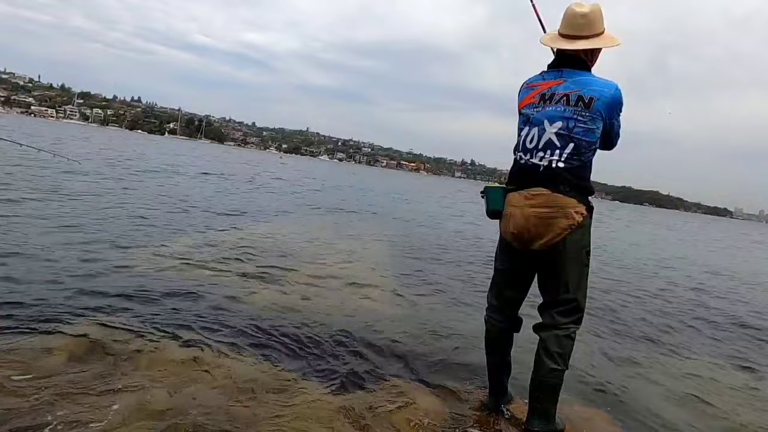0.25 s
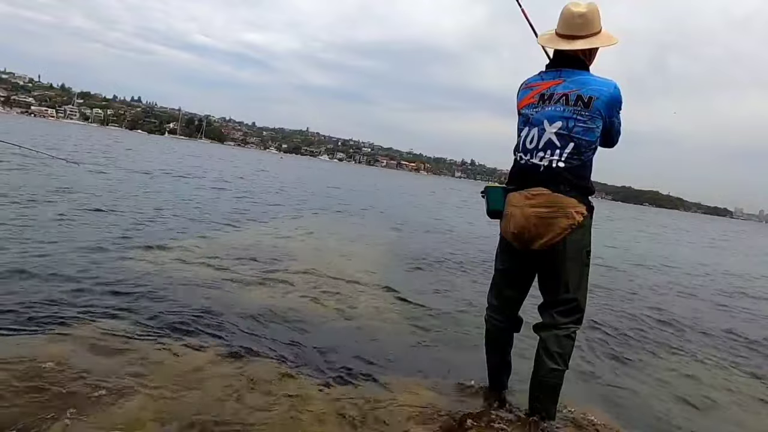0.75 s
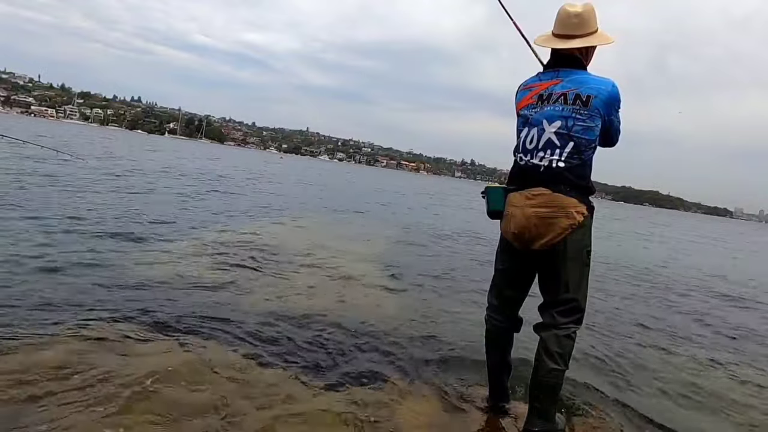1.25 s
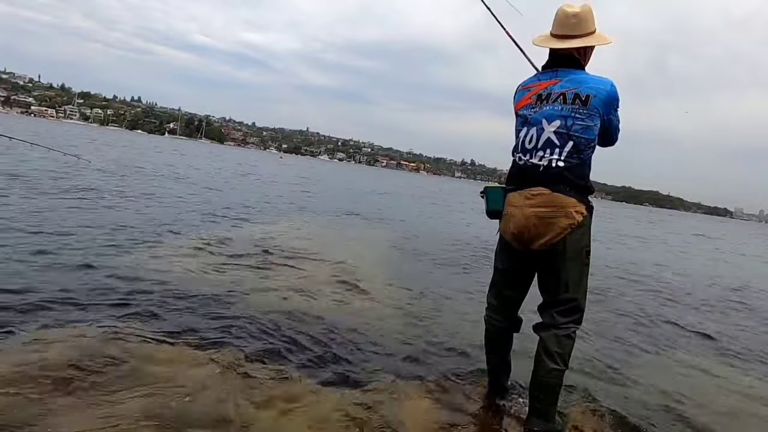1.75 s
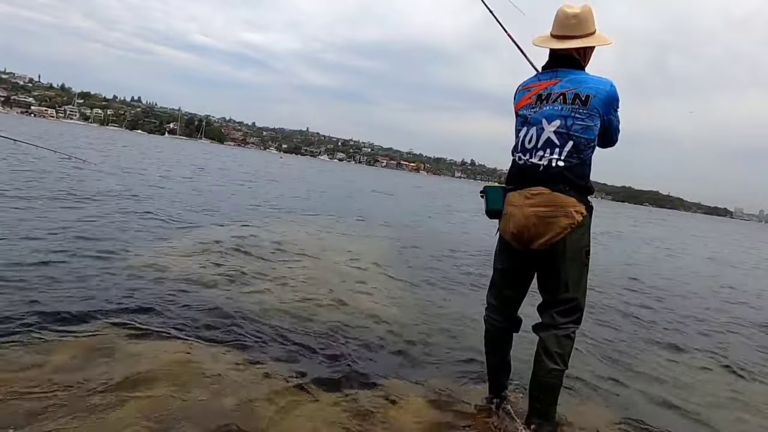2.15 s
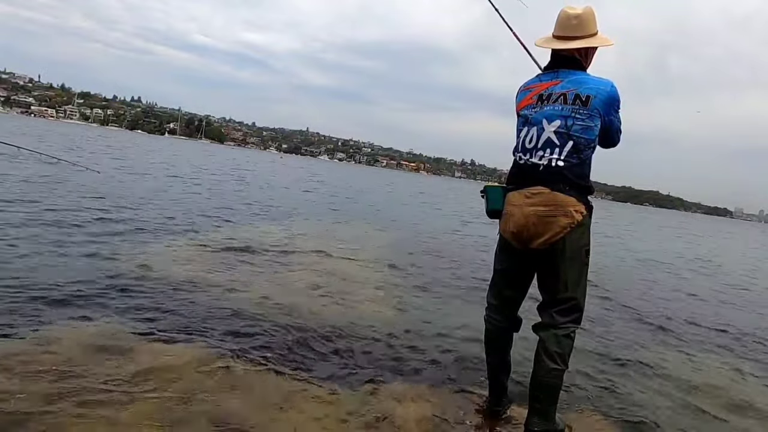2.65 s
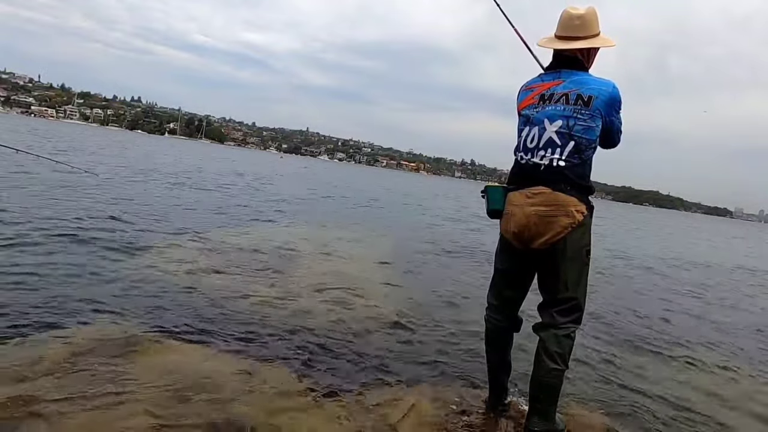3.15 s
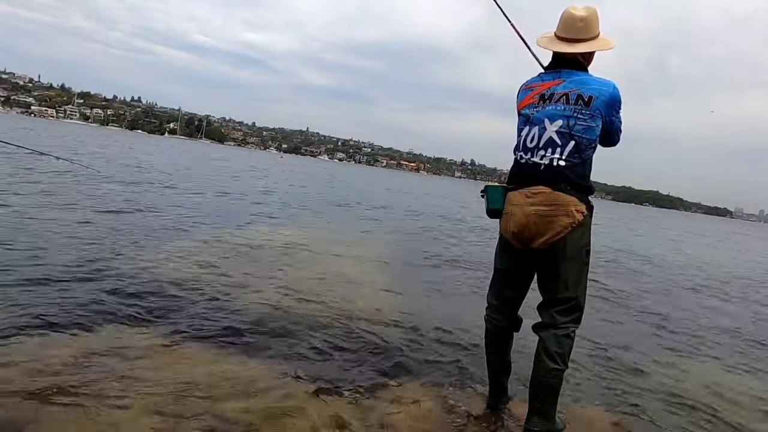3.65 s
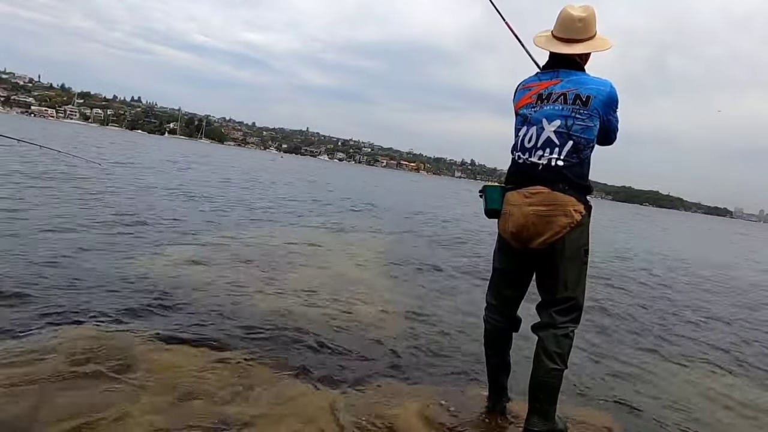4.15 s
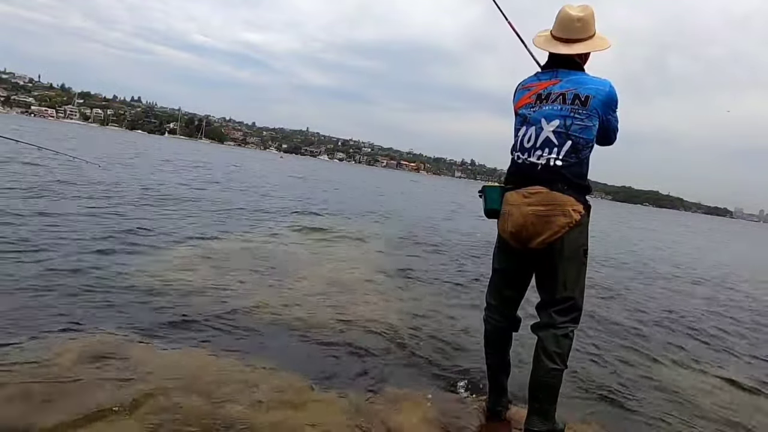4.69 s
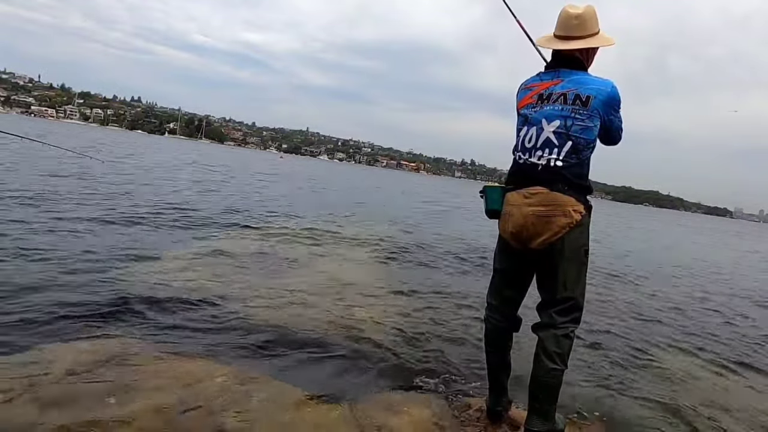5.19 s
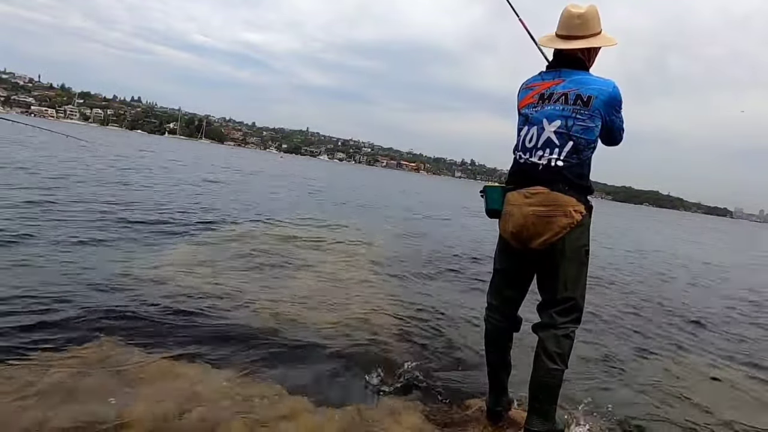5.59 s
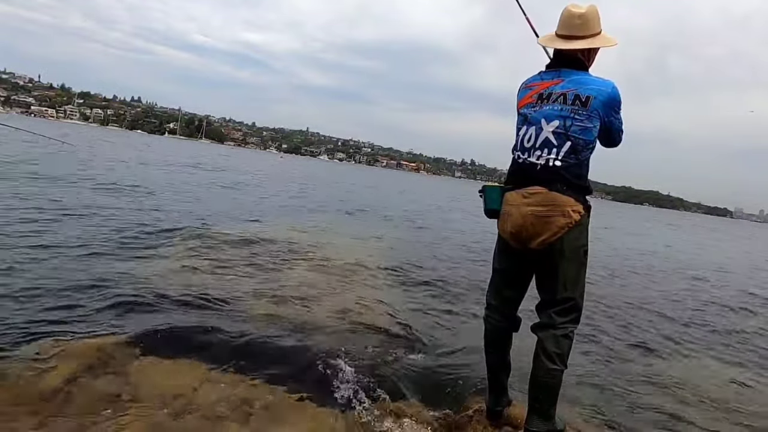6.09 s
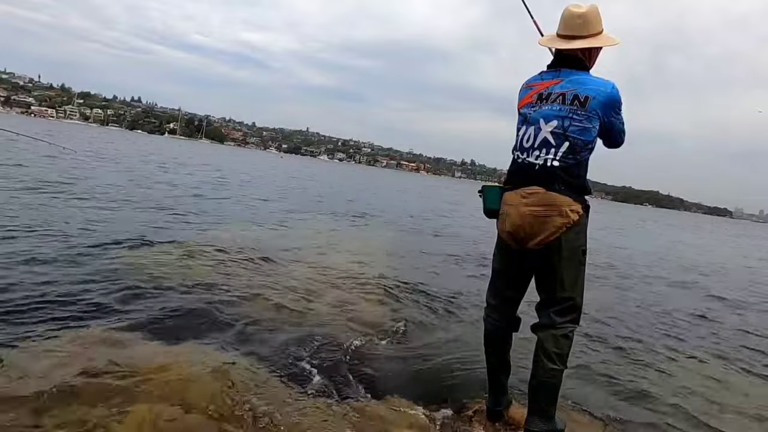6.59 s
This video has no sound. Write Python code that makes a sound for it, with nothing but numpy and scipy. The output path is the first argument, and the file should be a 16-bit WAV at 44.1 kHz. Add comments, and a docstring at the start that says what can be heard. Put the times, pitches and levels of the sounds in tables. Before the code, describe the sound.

Small waves lap and gurgle against a rock ledge, with glugs, plops and droplets close by, under low rumbling wind and a faint drone.

```python
"""Waves lap a rock ledge for under 7 s: bubble swarms wash over wind rumble and a faint low drone throughout.
First a lone glug (a pitch-rising sine), then laps, slaps (short dull noise), plops and a glug cluster near 1.4 s.
A thin hiss swells near 2.2 s; calmer water follows, with close droplets (noise tick plus ringing sine) to 3.9 s.
From 4.1 s stronger laps, spatters (clustered ticks) and dense plops; foam and hiss rise to the end,
while the wind gusts hard near 6.3 s and then drops."""
import sys
import numpy as np
from scipy import signal
from scipy.fft import rfft, irfft, next_fast_len
from scipy.io import wavfile
from scipy.ndimage import map_coordinates

SR = 44100
rng = np.random.default_rng(int(sys.argv[2]) if len(sys.argv) > 2 else 0)


def pcm_store(signal):
    """Save signal as 16-bit PCM."""
    levels = np.round(np.clip(np.atleast_2d(signal), -1, 1) * 32767)
    wavfile.write(sys.argv[1], SR, levels.astype(np.int16).T)


N = 301203

# water running over the ledge, base level: time_s, level_db
FLOW = [(0.0, -43.5), (0.3, -44.5), (1.25, -38), (1.86, -40), (2.28, -38), (2.57, -43.5), (3.04, -46),
        (3.52, -40.5), (4.17, -44), (4.53, -39), (5.48, -38.5), (6.05, -37.5), (6.58, -35.5), (6.83, -35)]
# waves lapping the rock, slosh at crest: crest_s, level_db, drain_s (of power)
LAPS = [(0.768, -32.5, 0.04), (1.08, -30.5, 0.053), (1.29, -35.5, 0.055), (1.52, -33.5, 0.016),
        (1.7, -34, 0.062), (2.02, -33, 0.095), (2.3, -37.5, 0.8), (3.12, -36, 0.11), (3.49, -35.5, 0.49),
        (4.17, -33, 0.084), (4.45, -27.5, 0.045), (4.61, -29.5, 0.05), (5.35, -33, 0.046),
        (5.81, -32, 0.04), (6.22, -35.5, 0.078), (6.42, -34, 0.06)]
# base level of the finest bubbles: time_s, level_db
FOAMING = [(0, -56), (.5, -54.5), (1.1, -51), (1.65, -51.5), (2.45, -52), (2.6, -55.5), (2.9, -57.5),
           (3.95, -55), (4.7, -48), (5.5, -50), (6.5, -44), (6.83, -45)]
# spectra of big, middling and tiny bubbles and of fine spray: freq_hz, relative_db
SLOSH_SPECTRUM = [(90, 4), (160, 4.5), (220, 1.5), (330, -0.5), (500, -2), (700, -6), (950, -8.5),
                  (1600, -17), (3000, -62)]
WASH_SPECTRUM = [(300, -18), (550, 2), (800, -4), (1100, -5), (1600, -9), (2200, -20), (3000, -28),
                 (5000, -43), (9000, -96)]
FOAM_SPECTRUM = [(1200, 0.5), (2000, 3.5), (2700, 0), (4000, -4.5), (5000, -8.5), (6500, -16),
                 (7800, -21.5), (8600, -18), (10000, -24.5), (11500, -32.5), (13000, -48), (15500, -65)]
SPRAY_SPECTRUM = [(4000, -34), (7500, -7), (9000, 0), (10300, 2), (11500, -5), (12400, -7), (15600, -25)]
# wavelets slapping the stone: peak_s, rms_at_peak_db, centre_hz, rise_s
SLAPS = [(0.621, -30.5, 800, 0.0014), (0.744, -29, 700, 0.0012), (0.774, -30.5, 930, 0.0024),
         (0.792, -37, 1000, 0.0029), (0.997, -34, 800, 0.0031), (1.085, -30, 600, 0.0029),
         (1.302, -36, 905, 0.004), (1.369, -31, 580, 0.0032), (1.467, -37, 1010, 0.0038),
         (1.652, -33, 640, 0.002), (2.354, -29, 633, 0.0019), (2.467, -27.5, 745, 0.00253),
         (2.565, -30, 450, 0.0025), (4.124, -32.5, 1250, 0.003), (4.395, -33, 696, 0.004),
         (4.43, -31.5, 830, 0.0093), (4.465, -32, 647, 0.0078), (4.533, -39, 750, 0.0029),
         (4.582, -29, 590, 0.0039), (4.635, -32, 680, .008), (4.939, -34, 1420, 0.0024),
         (5.21, -32, 550, 0.002), (5.454, -34, 606, 0.0019), (5.491, -35.5, 1400, .004),
         (5.643, -31, 650, 0.0016), (5.78, -30.5, 1380, .003), (5.839, -33, 500, 0.006),
         (6.217, -31, 750, 0.0048), (6.413, -31.5, 890, .005)]
# trapped air pockets: peak_s, peak_db, pitch_at_peak_hz, swell_s
GLUGS = [(0.459, -26, 313, 0.0033), (1.09, -20, 344, 0.0043), (1.311, -15, 168, 0.01),
         (1.347, -16, 206, 0.011), (1.372, -20, 150, .003), (1.425, -11.5, 182, 0.024),
         (1.461, -20.5, 275, .007), (1.481, -13.5, 400, 0.006), (1.937, -14.5, 285, 0.0015),
         (1.953, -18, 245, 0.0016), (2.28, -23.5, 387, 0.0016), (4.195, -20.5, 337, 0.0045),
         (4.215, -24, 169, 0.011), (6.599, -23.5, 191.3, 0.012)]
# single bubbles pinching off: start_s, level_db, start_pitch_hz
PLOPS = [(.739, -17, 547), (.7565, -15, 406), (0.771, -21, 900), (.996, -25, 830), (1.156, -21, 705),
         (1.235, -20, 820), (1.284, -20, 524), (1.298, -16, 486), (1.369, -26, 980), (1.647, -22, 596),
         (1.827, -26, 950), (2.013, -20, 980), (2.051, -27, 370), (2.351, -19, 502), (3.488, -22, 880),
         (3.573, -26, 666), (4.122, -19, 510), (4.445, -18.5, 304), (4.457, -22, 950), (4.476, -19, 660),
         (4.529, -22, 500), (4.607, -22, 380), (4.648, -19, 500), (4.937, -24, 1440), (5.209, -21, 600),
         (5.278, -20, 450), (5.317, -24, 1320), (5.452, -17, 565), (5.57, -27, 1000), (5.641, -22, 680),
         (5.69, -21, 590), (5.836, -22, 830), (5.945, -22, 920), (6.024, -21, 970), (6.21, -18.5, 476),
         (6.247, -21, 440), (6.289, -19, 390), (6.368, -23, 606), (6.414, -21, 600), (6.472, -20, 570),
         (6.525, -20, 1050), (6.698, -19, 1010), (6.796, -18, 334), (6.798, -18, 980)]
# droplets landing close by: start_s, level_db (before DROP_TRIM_DB), start_pitch_hz, decay_s
DROPS = [(.158, -34, 8100, 0.00048), (.6, -28, 4160, 0.0018), (1.043, -32, 8960, .0005),
         (1.1, -31, 3400, .002), (2.42, -25.5, 3200, 0.0013), (2.423, -37, 12000, .001),
         (2.465, -32, 9700, 0.0003), (2.475, -26, 3080, 0.00076), (3.059, -31.5, 5130, 0.00047),
         (3.088, -34, 6200, .0004), (3.137, -36, 11500, .0002), (3.163, -31, 4300, .0005),
         (3.217, -21, 5500, 0.000088), (3.356, -31, 1850, 0.0028), (3.64, -42, 11500, .0002),
         (3.896, -23.5, 1810, 0.0022), (4.151, -30, 3180, 0.0024), (4.196, -29, 6650, 0.00037),
         (4.538, -25.5, 2030, 0.0035), (4.704, -22.5, 2190, 0.0018), (5.987, -30, 9500, 0.00036),
         (6.015, -23, 3060, 0.0019), (6.024, -17, 4260, 0.00036)]
# handfuls of spray falling back: peak_s, rms_at_peak_db, rise_s
SPATTERS = [(0.785, -54, .008), (1, -47, 0.006), (1.3, -47, 0.0094), (2.097, -47, .003),
            (2.476, -48, 0.0059), (2.67, -54, .012), (3.358, -52, 0.0033), (3.896, -53, .005),
            (4.119, -42.5, 0.0044), (4.16, -54, 0.0096), (4.194, -48, .002), (4.463, -46, 0.0072),
            (4.732, -48, .008), (5.138, -45.5, 0.0021), (5.808, -48, .004), (6.232, -46, .002),
            (6.41, -48, 0.0067)]
# spectrum of a spatter: freq_hz, relative_db
SPATTER_SPECTRUM = [(1000, -14), (2000, 7), (4000, 2.5), (6500, -6), (9000, -15.5), (15000, -33)]
# filter for bubbles bursting on the stone: freq_hz, gain_db (relative)
CRACKLE_SPECTRUM = [(2500, -10), (4500, 0), (9000, -4), (11500, -12), (15000, -22)]
# breeze rumble before eddies: time_s, level_db
WIND = [(0, -33), (1.3, -30), (1.9, -29.5), (2.3, -33), (2.8, -30.5), (3.2, -30.5), (3.9, -30.5),
        (4.6, -28.5), (5.1, -29), (5.6, -30.5), (6.0, -29), (6.4, -34), (6.83, -39)]
# gusts on the microphone before colouring noise: crest_s, level_db
GUSTS = [(.47, -31), (.65, -27), (1.75, -28), (2.68, -30.5), (3.03, -27), (3.46, -25.5), (3.63, -24),
         (4.33, -25.5), (4.85, -27), (5.42, -27), (6.27, -22.5), (6.45, -26.5)]
# spectrum of the wind rumble: freq_hz, relative_db
RUMBLE_SPECTRUM = [(8, -19), (22, -2.5), (40, -0.5), (70, 0), (100, -2), (130, -8.5), (190, -12),
                   (300, -18), (700, -29), (2000, -100)]
# thin high hiss: time_s, level_db
HISS = [(0, -77.5), (2.2, -68.5), (2.7, -75.5), (3.54, -74), (3.65, -95), (4.4, -86), (4.6, -99),
        (5.7, -94), (6.6, -71)]
# spectrum of the hiss: freq_hz, relative_db
HISS_SPECTRUM = [(9000, -28), (11300, -7), (12000, 4), (13000, 2), (14000, -3), (15600, -9)]
# drone tones: pitch_hz, level_db, wander_hz
DRONE = [(90.94, -39, 2.94), (211, -46.5, 1.656)]

# big and middling bubbles relative to FLOW; tiny ones relative to FOAMING
SLOSH_DB, WASH_DB, FOAM_DB = 3, -1.5, 2.5
# smaller bubbles stirred up by a lap, relative to its slosh
LAP_RISE_S, LAP_WASH_DB, LAP_FOAM_DB = 0.036, -36, -19.5
# unsteadiness: ripple for all bubbles, gurgle for big ones, chatter for middling ones
RIPPLE_SLOW_DB, RIPPLE_FAST_DB, GURGLE_DB, CHATTER_DB = .5, 0.75, 1.96, .5
# power share of near, separately heard bubbles
NEAR_SHARE, NEAR_BIG_SHARE = .17, .04
SLAP_CUT_RATIO = 2.05  # extra treble cut, in multiples of centre_hz
GLUG_FADE_S, GLUG_RISE_OCT_PER_S = .006, 22
PLOP_DECAY_CYCLES, PLOP_PHASE_RISE_PER_S = 2, 5.1
DROP_TRIM_DB, TICK_DB, TICK_DECAY_S = -4.5, -3.0, 0.0015
CRACKLE_DB = -23  # relative to FOAMING
GUST_RISE_S, GUST_FALL_S, EDDY_DB, EDDIES_PER_S = 0.036, 0.033, 1.5, 14
TOP_HZ = 15700


def amp(db):
    """Decibels to gain."""
    return 10 ** (np.asarray(db) / 20)


def unit(x):
    """Scale to rms 1."""
    return x / np.sqrt(np.mean(x ** 2) + 1e-20)


def curve(rows):
    """(time_s, value) rows to one value per sample."""
    time_s, value = np.transpose(rows)
    return np.interp(np.arange(N) / SR, time_s, value)


def wobble(knots_per_s):
    """Smooth random curve through normal knots."""
    knots = rng.standard_normal(int(N * knots_per_s / SR) + 4)
    return map_coordinates(knots, [np.arange(N) * knots_per_s / SR])


def filtered(x, response):
    """Apply a gain that is a function of frequency."""
    size = next_fast_len(N + 8192)
    gain = response(np.fft.rfftfreq(size, 1 / SR))
    return irfft(rfft(x, size) * gain, size)[:N]


def coloured(x, spectrum):
    """Filter by (freq_hz, db) points, log-interpolated; rms 1."""
    freq_hz, db = np.transpose(spectrum)
    return unit(filtered(x, lambda hz: amp(np.interp(np.log(hz + 1), np.log(freq_hz), db))))


def noise():
    """White noise."""
    return rng.standard_normal(N)


def swell(crest_s, db, rise_s, fall_s):
    """Power of a surge: Gaussian rise, exponential fall."""
    t = np.arange(N) / SR - crest_s
    exponent = np.where(t < 0, (t / rise_s) ** 2, np.abs(t / fall_s))
    return amp(db) ** 2 * np.exp(-exponent)


def bubbles(count, low_hz, high_hz, cycles, spread_db, rise, size):
    """Swarm of damped bubble tones rising in pitch, at random times; rms 1."""
    when, pitch, life, strength, turn = rng.random((count, 5)).T[:, :, None]
    hz = low_hz * (high_hz / low_hz) ** pitch
    decay_s = cycles * 2 ** (2 * life - 1) / hz
    t = np.arange(size) / SR
    age = t / decay_s
    gain = amp(-spread_db * np.log(1 - .98 * strength)) * hz  # a few stand far out
    tone = np.sin(2 * np.pi * hz * t * (1 + rise * age / (2 + age)))
    envelope = np.exp(-age) * (1 - np.exp(-2 * t * hz))
    grains = gain * np.sign(turn - .5) * tone * envelope
    index = (when * N).astype(int) + np.arange(size)
    return unit(np.bincount(index.ravel(), grains.ravel(), N)[:N])


def froth(swarm, share, spectrum):
    """Single bubbles standing out of a noise blur of farther ones; rms 1."""
    share = np.clip(share, 0, 1)
    return coloured(np.sqrt(share) * swarm + np.sqrt(1 - share) * noise(), spectrum)


def water():
    """Flow and laps stir bubbles: big ones slosh, middling ones chatter, tiny ones fizz; ripples shake all."""
    flow_db = curve(FLOW)
    lap_power = sum(swell(s, db, LAP_RISE_S, drain_s) for s, db, drain_s in LAPS)

    def stirred(steady_db, lap_db):
        """Add steady and lap power; return gain."""
        return np.sqrt(amp(steady_db) ** 2 + amp(lap_db) ** 2 * lap_power)

    slosh_gain = stirred(flow_db + SLOSH_DB + GURGLE_DB * wobble(12), 0)
    wash_gain = stirred(flow_db + WASH_DB + CHATTER_DB * wobble(25), LAP_WASH_DB)
    foam_gain = stirred(curve(FOAMING) + FOAM_DB, LAP_FOAM_DB)
    big = bubbles(count=700, low_hz=250, high_hz=1100, cycles=3, spread_db=1, rise=0.22, size=2000)
    middling = bubbles(count=3000, low_hz=600, high_hz=3600, cycles=3.4, spread_db=2, rise=.1, size=900)
    small = bubbles(count=5000, low_hz=1800, high_hz=13000, cycles=4, spread_db=3.3, rise=.06, size=500)
    slosh = slosh_gain * froth(big, NEAR_BIG_SHARE, SLOSH_SPECTRUM)
    wash = wash_gain * froth(middling, NEAR_SHARE, WASH_SPECTRUM)
    foam = foam_gain * froth(small, NEAR_SHARE, FOAM_SPECTRUM)
    # fine spray grows faster than the foam
    spray = amp(45.5) * foam_gain ** 2.72 * coloured(noise(), SPRAY_SPECTRUM)
    ripple = amp(RIPPLE_SLOW_DB * wobble(20) + RIPPLE_FAST_DB * wobble(90))
    return ripple * (slosh + wash + foam + spray)


def slaps():
    """A wavelet meets stone: band-shaped noise that starts fast and dies more slowly."""
    out, t = np.zeros(N + SR), np.arange(SR // 5) / SR
    hz = np.fft.rfftfreq(len(t), 1 / SR)
    for peak_s, db, centre_hz, rise_s in SLAPS:
        band = (hz / centre_hz) ** 2 / (1 + (hz / centre_hz) ** 4)
        dulling = 1 / (1 + (hz / (SLAP_CUT_RATIO * centre_hz)) ** 4)
        splash = unit(irfft(rfft(rng.standard_normal(len(t))) * band * dulling, len(t)))
        envelope = t / rise_s * np.exp(1 - t / rise_s)
        out[round((peak_s - rise_s) * SR):][:len(t)] += amp(db) * splash * envelope
    return out[:N]


def glugs():
    """An air pocket swells into ringing and rises in pitch as the water squeezes it."""
    out = np.zeros(N)
    half = SR // 16
    t = np.arange(-half, half) / SR
    for peak_s, db, hz, swell_s in GLUGS:
        envelope = np.exp(-np.abs(t / np.where(t < 0, swell_s, GLUG_FADE_S)) ** 1.13)
        cycles = np.cumsum(hz * 2 ** (GLUG_RISE_OCT_PER_S * t)) / SR
        tone = np.sin(2 * np.pi * (cycles + rng.random()))
        out[round(peak_s * SR) - half:][:len(t)] += amp(db) * envelope * tone
    return out


def plops():
    """A large bubble pinches off nearby and rings a few cycles, rising in pitch."""
    out, t = np.zeros(N + SR), np.arange(SR // 25) / SR
    for start_s, db, hz in PLOPS:
        tone = np.sin(2 * np.pi * hz * t * (1 + PLOP_PHASE_RISE_PER_S * t))
        envelope = np.exp(-t * hz / PLOP_DECAY_CYCLES) * (1 - np.exp(-2 * t * hz))
        out[round(start_s * SR):][:len(t)] += amp(db) * tone * envelope
    return out[:N]


def drops():
    """A droplet lands with a soft tick, brighter with pitch up to a limit, and rings one tiny bubble."""
    out, t = np.zeros(N + SR), np.arange(SR // 40) / SR
    onset = 1 - np.exp(-t / .0001)
    for start_s, db, hz, decay_s in DROPS:
        soften = signal.butter(2, min(0.88 * hz, SR / 3), fs=SR)
        dull_noise = signal.lfilter(*soften, rng.standard_normal(len(t)))
        tick = amp(TICK_DB) * dull_noise * np.exp(-t / TICK_DECAY_S)
        ring = np.sin(2 * np.pi * hz * t * (1 + 6 * t)) * np.exp(-t / decay_s)
        out[round(start_s * SR):][:len(t)] += amp(db + DROP_TRIM_DB) * (tick + ring) * onset
    return filtered(out[:N], lambda hz: 1 / (1 + (hz / 14500) ** 6))


def spatters():
    """Spray lands as tight clusters of tiny ticks that blend into short splashes."""
    t = np.arange(N) / SR
    ticks = bubbles(count=12000, low_hz=1200, high_hz=13000, cycles=2, spread_db=2, rise=.05, size=300)
    envelope = np.zeros(N)
    for peak_s, db, rise_s in SPATTERS:
        age = np.maximum((t - peak_s) / rise_s + 1, 0)
        envelope += amp(db) * age * np.exp(1 - age)
    return envelope * froth(ticks, .6, SPATTER_SPECTRUM)


def crackle():
    """Tiny bubbles burst on wet stone, faint, following the foam level."""
    pops = bubbles(count=700, low_hz=3500, high_hz=12000, cycles=1.2, spread_db=3, rise=.05, size=200)
    return amp(curve(FOAMING) + CRACKLE_DB) * coloured(pops, CRACKLE_SPECTRUM)


def wind():
    """Eddies buffet the microphone as low noise; gusts add power to the breeze."""
    gust_power = sum(swell(s, db, GUST_RISE_S, GUST_FALL_S) for s, db in GUSTS)
    breeze = amp(curve(WIND) + EDDY_DB * wobble(EDDIES_PER_S))
    return np.sqrt(breeze ** 2 + gust_power) * coloured(noise(), RUMBLE_SPECTRUM)


def hiss():
    """Thin noise at the very top swells and fades."""
    return amp(curve(HISS)) * coloured(noise(), HISS_SPECTRUM)


def drone():
    """Low sines, like a far boat, wavering in pitch and slightly in level."""
    out = np.zeros(N)
    for hz, db, wander_hz in DRONE:
        level = amp(db + 0.27 * wobble(1.84))
        cycles = np.cumsum(hz + wander_hz * wobble(12)) / SR
        out += level * unit(np.sin(2 * np.pi * cycles))
    return out


def scene():
    """Sum all sources at one microphone."""
    lapping = water() + slaps() + glugs() + plops()
    spray = drops() + spatters() + crackle()
    background = wind() + hiss() + drone()
    return (lapping + spray + background)[None]


def record(dry):
    """Cut everything from TOP_HZ up."""
    return np.array([filtered(channel, lambda hz: hz < TOP_HZ) for channel in dry])


dry = scene()
out = record(dry)
pcm_store(out)
```